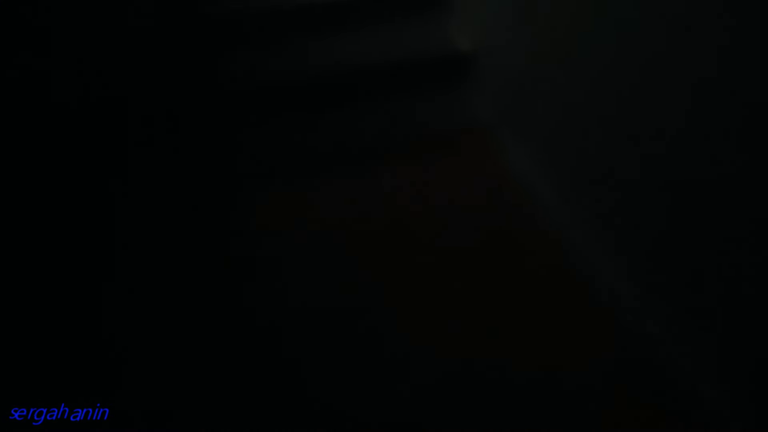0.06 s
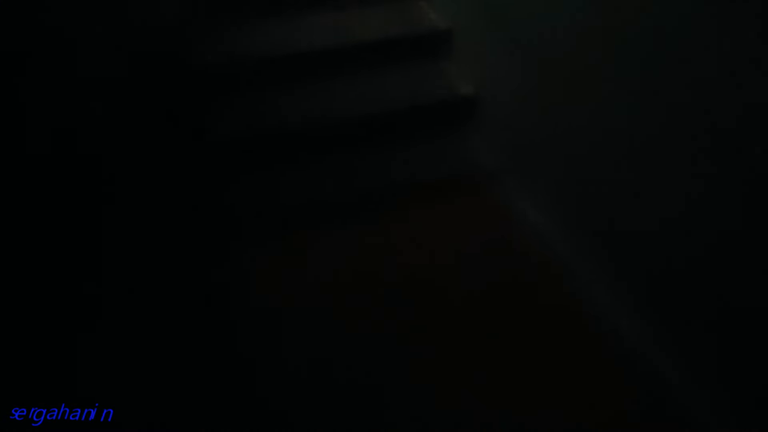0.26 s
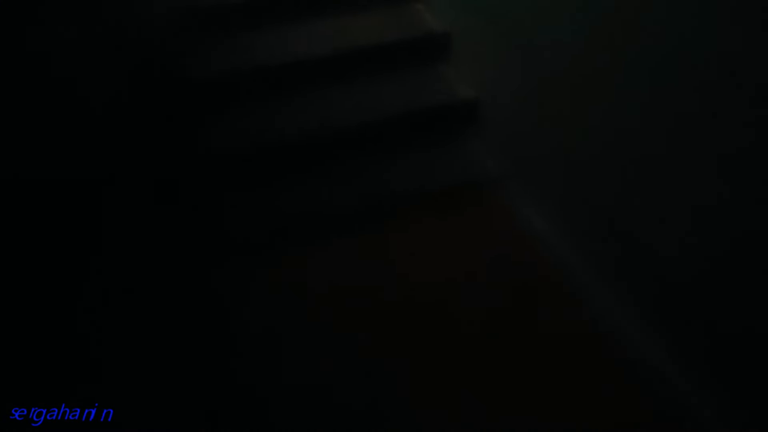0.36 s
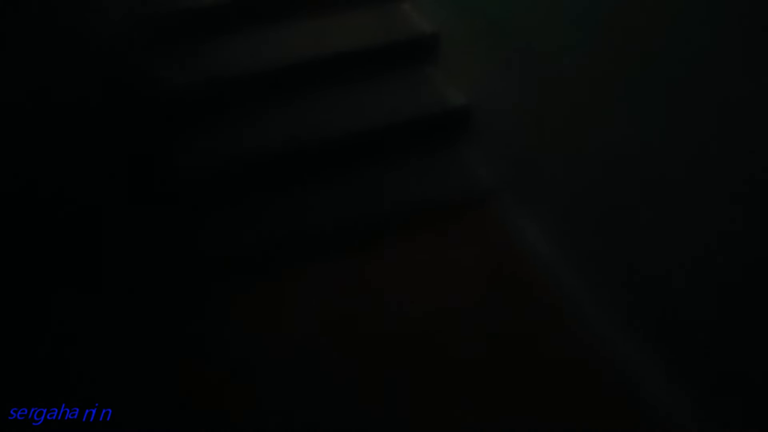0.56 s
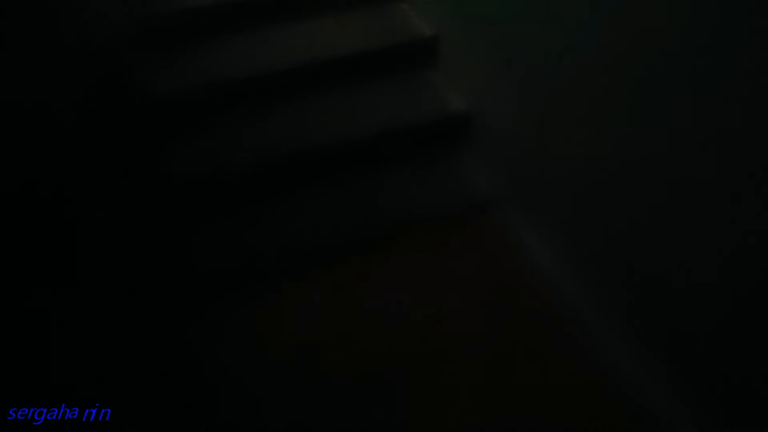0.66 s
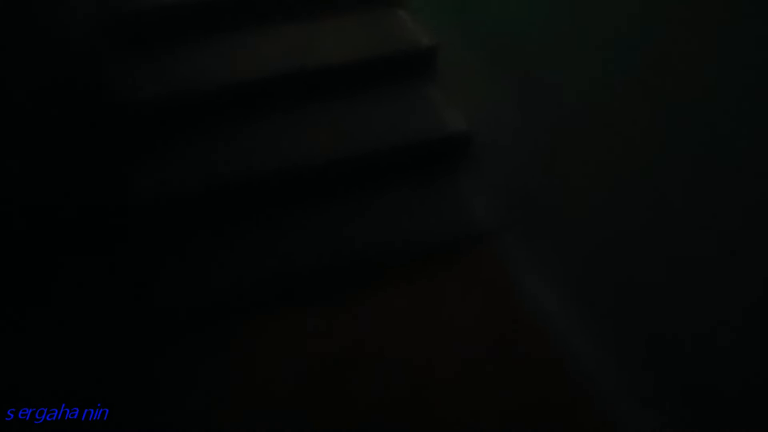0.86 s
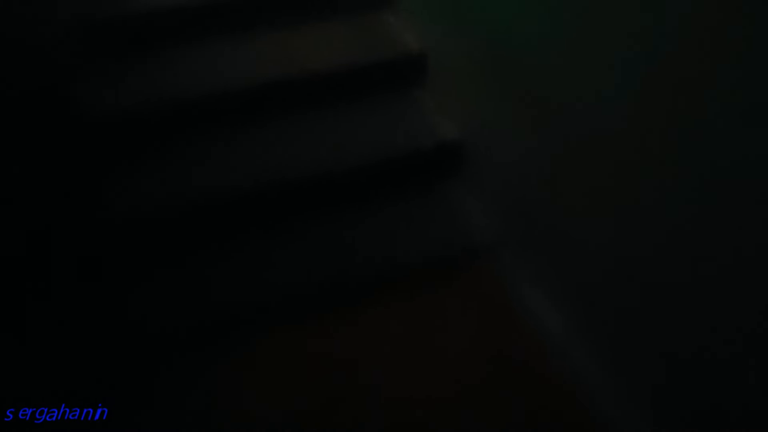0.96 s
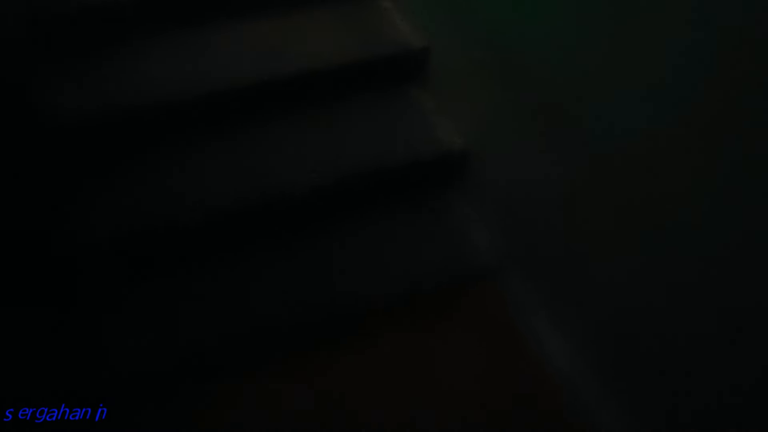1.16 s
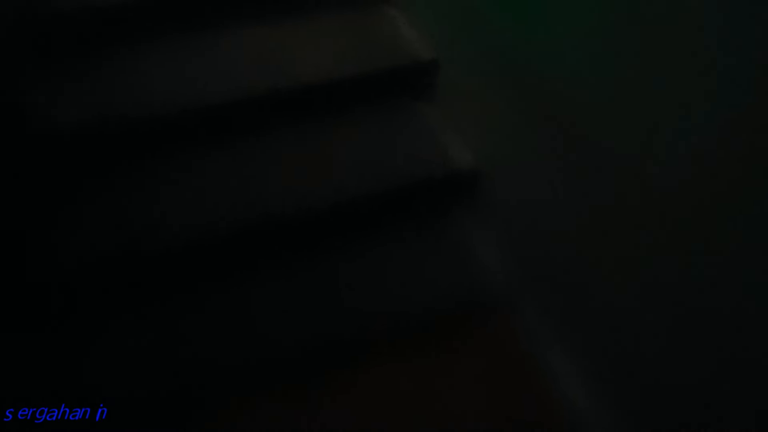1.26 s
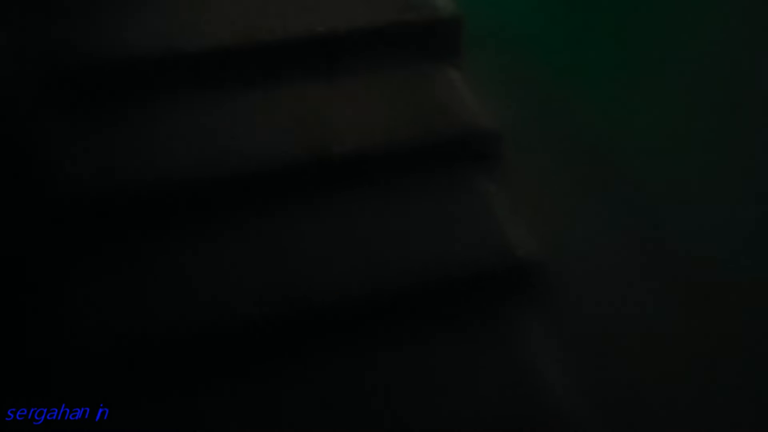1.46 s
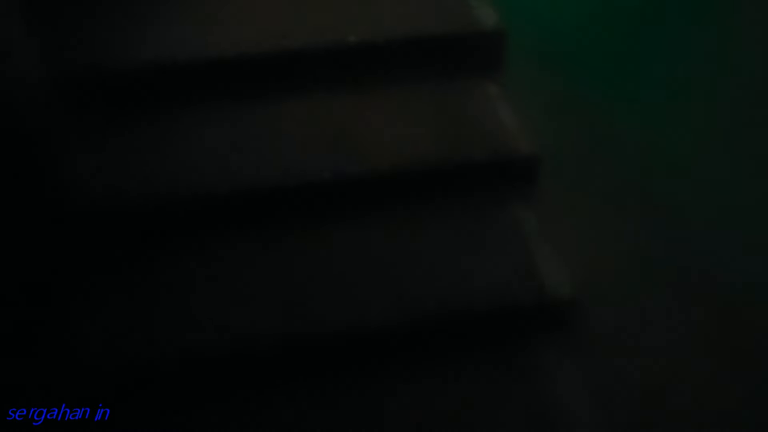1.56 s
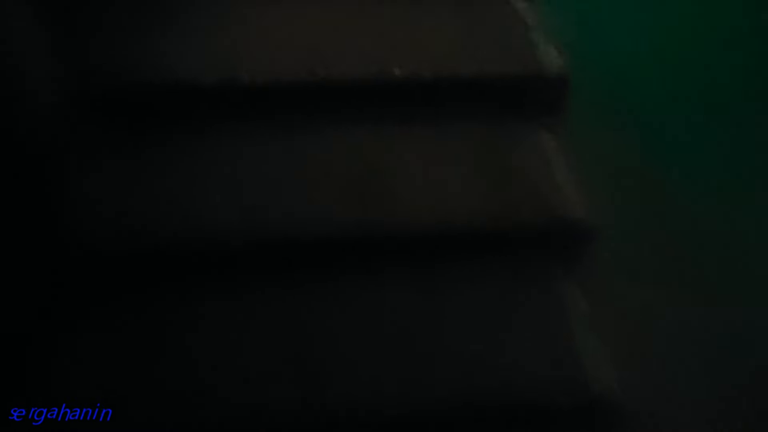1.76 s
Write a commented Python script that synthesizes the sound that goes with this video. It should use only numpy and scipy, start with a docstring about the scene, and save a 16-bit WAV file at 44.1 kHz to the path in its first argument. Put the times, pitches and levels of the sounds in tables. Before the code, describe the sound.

A door slams in a concrete stairwell at about 0.2 seconds, after faint hiss and a brush of clothing. The latch clacks, the door rattles, and the loud, slightly overloaded bang echoes away over a second, leaving a low hum. Close by, clothes rustle softly from 0.7 to 1.2 seconds, with a dull step near 0.9. Grit ticks at 1.3 and 1.7, and a sole scuffs from 1.5.

```python
"""Faint hiss and a brush of clothing near the microphone, then a door slams in a concrete stairwell.
The latch strikes, the leaf hits the frame and rattles, and the bang swells and dies away up the shaft,
lows last, while the door rings and the air between the walls hums on. The bang overloads the recorder.
Close by, someone climbs the stairs: clothes rustle, a foot settles, grit ticks and a sole scuffs a step."""
import sys
import numpy as np
from scipy import signal
from scipy.io import wavfile

SR = 44100
rng = np.random.default_rng(int(sys.argv[2]) if len(sys.argv) > 2 else 0)


def waveform_to_disk(signal):
    """Save audio, clipped to [-1, 1], as 16-bit WAV at the path in sys.argv[1]."""
    frames = np.transpose(np.atleast_2d(signal))
    scaled = np.clip(frames, -1, 1) * 32767
    samples = np.round(scaled).astype(np.int16)
    wavfile.write(sys.argv[1], SR, samples)


N = 79380


def from_db(db):
    """Decibels to gain."""
    return 10 ** (np.asarray(db) / 20)


def rms_one(x):
    """Scale to rms 1."""
    return x / np.sqrt(np.mean(x ** 2) + 1e-20)


def clock():
    """Time of each sample in seconds."""
    return np.arange(N) / SR


def in_time(rows):
    """Read rows of (seconds, value) at each sample."""
    return np.interp(clock(), *np.transpose(rows))


def at_hz(rows, hz):
    """Read rows of (Hz, value) on a log-frequency axis."""
    row_hz, value = np.transpose(rows)
    return np.interp(np.log(hz), np.log(row_hz), value)


def flutter(per_s):
    """Random wavering with spread 1."""
    knots = rng.standard_normal(N)
    return rms_one(np.interp(clock() * per_s, np.arange(N), knots))


def rising(start, attack):
    """Silent until start, then easing up to 1."""
    return 1 - np.exp(-np.maximum(clock() - start, 0) / attack)


def dying(start, t60, hold=0):
    """Silent until start, then held, then falling 60 dB in t60 seconds."""
    age = clock() - start
    return (age >= 0) * from_db(-60 * np.maximum(age - hold, 0) / t60)


def ring(start, hz, t60):
    """A struck resonance of height 1."""
    return np.sin(2 * np.pi * hz * (clock() - start)) * dying(start, t60)


def cut(x, hz, kind, order):
    """Butterworth low-pass, high-pass or band-pass."""
    return signal.sosfilt(signal.butter(order, hz, kind, fs=SR, output="sos"), x)


def panned(x, left_db):
    """Left louder than right by left_db."""
    return x * from_db([[left_db / 2], [-left_db / 2]])


# How alike the microphone's two sides are. Each row: frequency in Hz, left-right correlation.
MIC_LIKENESS = [(30, 0.97), (120, 1), (350, 0.98), (750, 0.87), (1000, 0.95), (1300, 0.54), (2300, 0.44),
                (3300, 0.026), (5600, -.1), (8000, 0.14), (14000, -0.12)]
def diffuse_bands(spectrum):
    """Stereo noise arriving from all sides: third-octave centres, and bands that sum to rms 1."""
    edges = 25 * 2 ** (np.arange(29) / 3)
    centres, bands = np.sqrt(edges[1:] * edges[:-1]), []
    white = rng.standard_normal((2, 2, N + SR // 2))
    for k, hz in enumerate(centres):
        mid, side = cut(white[k % 2], edges[k:k + 2], "band", order=3)[:, -N:]
        alike = np.clip(at_hz(MIC_LIKENESS, hz), -.9, .995)
        width = np.sqrt((1 - alike) / (1 + alike))
        bands.append(from_db(at_hz(spectrum, hz)) * (mid + width * side * [[1], [-1]]))
    return centres, np.array(bands) / np.std(sum(bands))


def diffuse_noise(spectrum):
    """All the bands together, at rms 1."""
    _, bands = diffuse_bands(spectrum)
    return bands.sum(0)


def friction(spectrum, grain_db=1):
    """Rubbing noise, broken into tiny catches."""
    return rms_one(diffuse_noise(spectrum) * from_db(grain_db * flutter(per_s=770)))


# Colour of the room tone. Each row: frequency in Hz, relative level in dB per Hz.
ROOM_SPECTRUM = [(30, -13), (60, -15), (130, -18.5), (300, -11.5), (600, -2), (1100, -2), (1900, -6.5),
                 (2600, -2.5), (4000, -12), (9000, -19), (15500, -27.5)]
# Its slow drift. Each row: time in seconds, level in dB.
ROOM_LEVEL = [(0, -47), (.22, -44), (.7, -43.5), (1.25, -41.5), (1.38, -45), (1.8, -44)]
def room_tone():
    """The stairwell's faint hiss, all around the microphone."""
    return from_db(in_time(ROOM_LEVEL)) * diffuse_noise(ROOM_SPECTRUM)


# The climber's clothes. Each row: peak time, rise and fall in seconds, level in dB, treble edge in Hz.
CLOTH_SWISHES = [(.095, .018, 0.013, -39, 7000), (0.811, 0.1, 0.062, -33, 14100),
                 (0.971, 0.027, 0.044, -31.5, 5000), (1.07, 0.023, 0.018, -34.5, 6070),
                 (1.155, .035, 0.042, -31.5, 4830)]
# Colour of the rubbing cloth. Each row: frequency in Hz, relative level in dB per Hz.
CLOTH_SPECTRUM = [(530, -37), (900, -9), (2330, -5.5), (2500, -4.5), (3450, -6.5), (3980, -19.5),
                  (4270, -11.5), (15400, -24)]
def clothes():
    """Near the microphone, fabric slides over fabric in soft swells, each with its own brightness."""
    t, out = clock(), 0
    rub = cut(friction(CLOTH_SPECTRUM), 515, "high", order=2)
    for peak, rise, fall, db, edge_hz in CLOTH_SWISHES:
        motion = np.exp(-.5 * ((t - peak) / np.where(t < peak, rise, fall)) ** 2)
        out = out + from_db(db) * motion * cut(rub, edge_hz, "low", order=1)
    return out


# Thump of the door leaf. Each row: frequency in Hz, level in dB, time to fall 60 dB in seconds.
LEAF_MODES = [(165, -20.5, 0.18), (315, -14.5, 0.058)]
def latch_and_leaf(start=.2321):
    """The bolt clacks against the strike plate and the leaf thumps."""
    thump = sum(from_db(db) * ring(start, hz, t60) for hz, db, t60 in LEAF_MODES)
    clack = from_db(-4) * ring(start, hz=1256, t60=0.039)
    return cut(clack + thump, 167, "high", order=3)


# The door hits its frame, then rattles. Each row: start in seconds, relative level in dB, extra bass in dB.
DOOR_BLOWS = [(.232, 0.5, 2.5), (0.2387, 3, -8), (0.254, 3, 0), (.283, -6, 7.5), (.378, -28, -4)]
# Colour of the bang at the microphone. Each row: frequency in Hz, relative level in dB per Hz.
BANG_SPECTRUM = [(30, -31), (70, -32.5), (115, -26.5), (160, -19), (220, -9), (340, -6), (430, -6.5),
                 (650, -4), (1200, -5), (2000, -6.5), (3500, -10), (7400, -18), (11000, -24.5),
                 (13000, -32), (15500, -35)]
# Reverberation of the concrete shaft. Each row: frequency in Hz, time to fall 60 dB in seconds.
SHAFT_T60 = [(40, 2.1), (150, 1.36), (300, 0.98), (600, 0.96), (1200, 0.67), (2500, 0.56), (5000, .455),
             (9000, 0.29), (15000, 0.33)]
# Reflections gathering in the shaft. Each row: frequency in Hz, build-up time in seconds.
ECHO_BUILD_UP = [(60, 0.0041), (250, .03), (600, 0.022), (1500, 0.0028), (10000, 0.0021)]
SLAM_S, HOLD_S, SWELL_S = DOOR_BLOWS[0][0], 0.0078, 0.026
def bang(level_db=-10.5, bass_edge_hz=340):
    """Each blow fills the shaft with reflections that build up and die at a rate set by their pitch."""
    out = 0
    for hz, band in zip(*diffuse_bands(BANG_SPECTRUM)):
        t60, build_up = at_hz(SHAFT_T60, hz), at_hz(ECHO_BUILD_UP, hz)
        bass_share = 1 / (1 + (hz / bass_edge_hz) ** 2)
        power = 0
        for start, db, bass_db in DOOR_BLOWS:
            strength = from_db(db + bass_share * bass_db)
            near = dying(start, t60, HOLD_S)
            far = from_db(-16) * dying(start, t60=min(2.6, 2 * t60))  # late echo from other landings
            power = power + strength ** 2 * (near ** 2 + far ** 2) * rising(start, build_up)
        out = out + band * np.sqrt(power)
    return from_db(level_db) * out


# Ringing of the door and its frame. Each row: frequency in Hz, relative level in dB.
DOOR_RESONANCES = [(228, -5.5), (342, -4.5), (375, -2), (490, -2), (533, -4), (581, 2.5), (633, 4),
                   (711, 1), (785, 4.5), (876, -9), (1001, 2), (1088, 1.5), (1226, 4.5), (1303, 6),
                   (1757, -0.5), (1982, 2), (2115, -2), (2213, 4), (3246, 0.5), (3529, 4.5)]
def door_ring(level_db=-21):
    """The door's modes swell and linger, reaching each side of the microphone with their own phase."""
    out = 0
    for hz, db in DOOR_RESONANCES:
        alike = np.clip(at_hz(MIC_LIKENESS, hz), -1, 1)
        side_shift = np.arccos(alike) / 2 * rng.choice([-1, 1])
        phase = 2 * np.pi * (hz * clock() + rng.random()) + 0.38 * flutter(per_s=24.75)
        tone = np.sin(phase + side_shift * np.array([[1], [-1]]))
        out = out + from_db(db) * tone * dying(SLAM_S, at_hz(SHAFT_T60, hz), HOLD_S)
    return from_db(level_db) * rising(SLAM_S, SWELL_S) * out


# Air resonances of the shaft. Each row: frequency in Hz, level in dB, time to fall 60 dB in seconds.
STANDING_WAVES = [(106.5, -46.5, 2.43), (152, -45.5, 2.9), (157.5, -44.5, 2.96), (229.2, -42, 1.83),
                  (252, -41.5, 2.4), (431, -42.5, 2.6), (596, -40, 2.9)]
def shaft_hum(waver_db=3.0):
    """Standing waves between the walls outlast the rest of the echo."""
    hum = sum(from_db(db + waver_db * flutter(per_s=13.7)) * ring(SLAM_S, hz, t60)
              for hz, db, t60 in STANDING_WAVES)
    return rising(SLAM_S, SWELL_S) * hum


# Colour of a soft step close by. Each row: frequency in Hz, relative level in dB per Hz.
STEP_SPECTRUM = [(30, -6), (70, -16), (200, -26), (450, 3.5), (1200, 7.5), (2000, 0.5), (8000, -42)]
def footfall(start=0.904):
    """A foot settles on a stair with a dull, echoing thud."""
    envelope = rising(start, attack=0.031) * dying(start, t60=1)
    return from_db(-32.5) * envelope * diffuse_noise(STEP_SPECTRUM)


# Smooth fabric near the microphone. Each row: peak time in seconds, width in seconds, level in dB.
FABRIC_CATCHES = [(1.071, 0.0073, -45), (1.14, .03, -52)]
# Colour of those catches. Each row: frequency in Hz, relative level in dB per Hz.
CATCH_SPECTRUM = [(3000, -40), (7000, -14), (8800, 3), (11000, -17), (15000, -10)]
def fabric_zips():
    """Smooth fabric catches with a thin, high zip."""
    motion = sum(from_db(db) * np.exp(-.5 * ((clock() - peak) / width) ** 2)
                 for peak, width, db in FABRIC_CATCHES)
    return motion * friction(CATCH_SPECTRUM)


# Grit underfoot, close by. Each row: start in seconds, sharp snap in dB, dull knock in dB.
GRIT_TICKS = [(1.2928, -17.5, -25), (1.325, -44, -24.5), (1.6123, -54, -17), (1.7173, -18, -26),
              (1.7276, -19, -24)]
def grit():
    """Grains crack with a snap and a knock, answered by the nearest walls."""
    ticks = 0
    for start, snap_db, knock_db in GRIT_TICKS:
        snap = from_db(snap_db) * ring(start, hz=3580, t60=0.0019)
        knock = from_db(knock_db) * ring(start, hz=1080, t60=0.0028)
        ticks = ticks + snap + knock
    ticks = cut(ticks, 500, "high", order=2)
    ticks = cut(ticks, 5320, "low", order=3)
    walls = rms_one(rng.standard_normal((2, N)) * dying(0, t60=0.11)) / np.sqrt(N)
    echo = signal.fftconvolve(ticks[None], walls, axes=1)[:, :N]
    return ticks + from_db(-9) * echo


# The scuff follows the pressure of the sole. Each row: time in seconds, level in dB.
SCUFF_LEVEL = [(1.49, -58), (1.53, -36), (1.58, -36), (1.615, -32.5), (1.66, -37), (1.72, -41),
               (1.755, -52), (1.777, -42), (1.8, -47)]
# Colour of sole on concrete. Each row: frequency in Hz, relative level in dB per Hz.
SOLE_SPECTRUM = [(88, -54), (150, -20.5), (471, -13), (519, -9), (668, -12), (736, -6.5), (1340, -5),
                 (1660, -7.5), (3970, -8), (15400, -24.5)]
def shoe_scuff():
    """A sole slides onto a step near the microphone."""
    return from_db(in_time(SCUFF_LEVEL)) * friction(SOLE_SPECTRUM)


def scene():
    """From the microphone: door and climber both a little to the right, room tone all around."""
    door = latch_and_leaf() + bang() + door_ring() + shaft_hum()
    climber = clothes() + fabric_zips() + footfall() + shoe_scuff() + grit()
    return panned(door, left_db=-1.5) + panned(climber, left_db=-2) + room_tone()


def record(dry, mic_top_hz=14200, cutoff_hz=15700):
    """The overloaded recorder rounds off the peaks; the treble rolls away and the very top is cut."""
    squashed = cut(np.tanh(dry), mic_top_hz, "low", order=2)
    steep_low_pass = signal.ellip(10, .1, 60, cutoff_hz, fs=SR, output="sos")
    return signal.sosfiltfilt(steep_low_pass, squashed)


dry = scene()
out = record(dry)
waveform_to_disk(out)
```